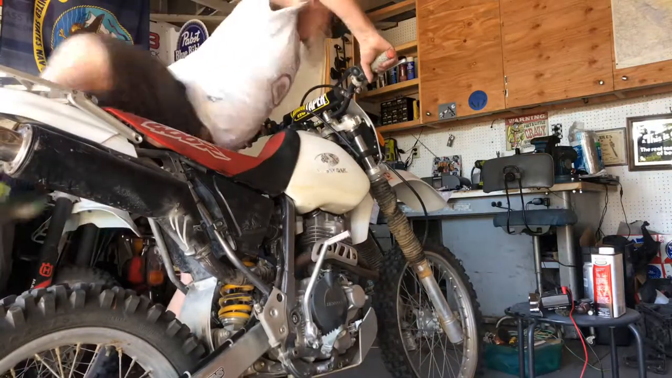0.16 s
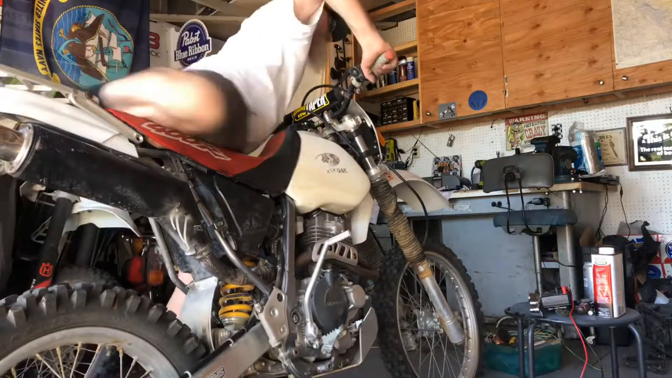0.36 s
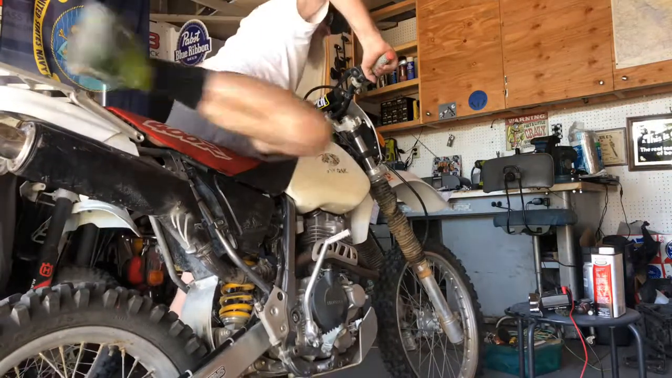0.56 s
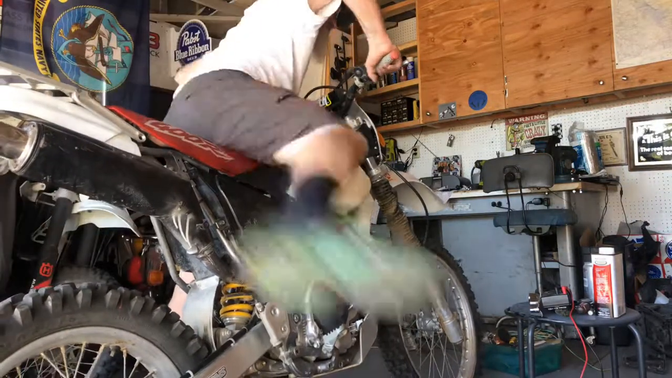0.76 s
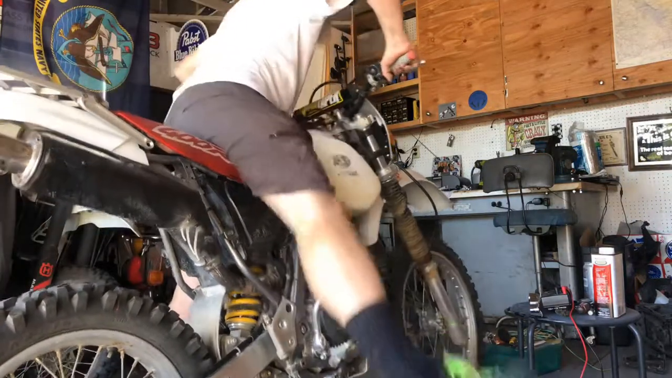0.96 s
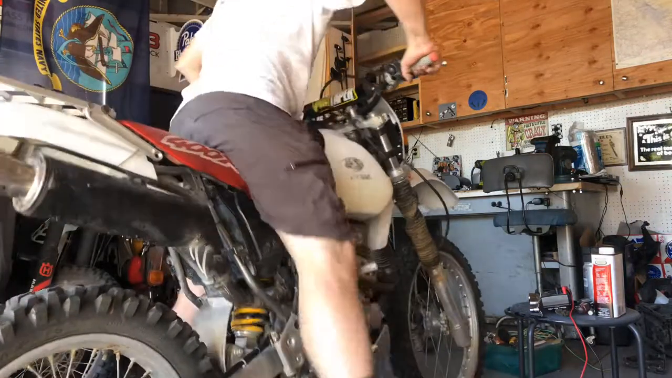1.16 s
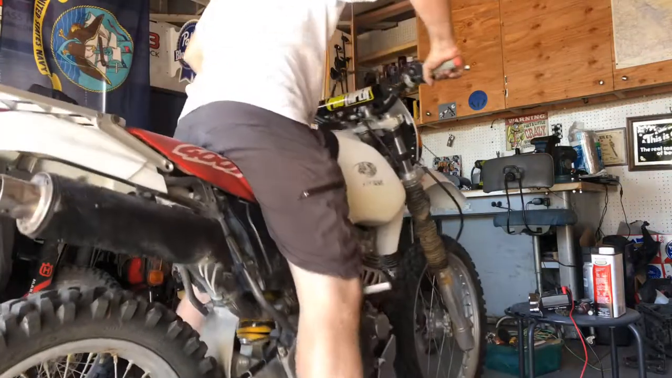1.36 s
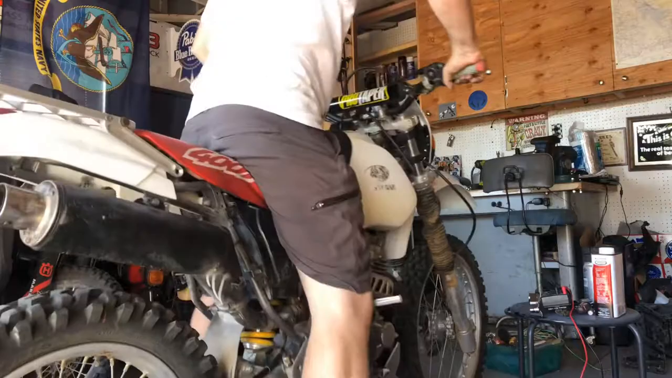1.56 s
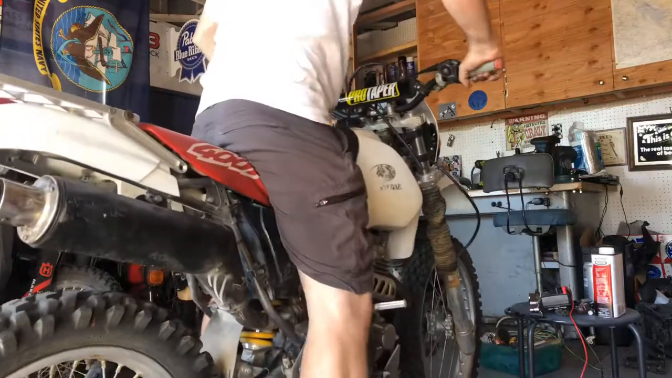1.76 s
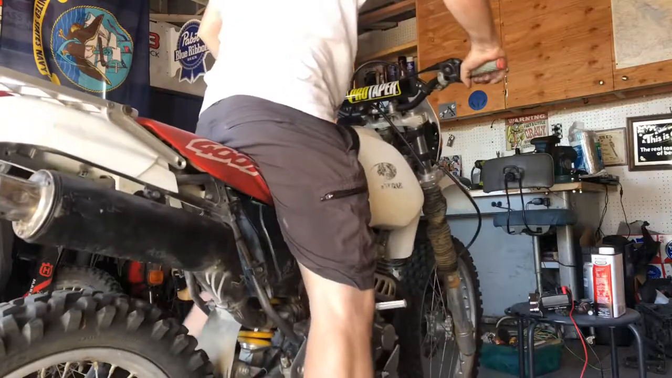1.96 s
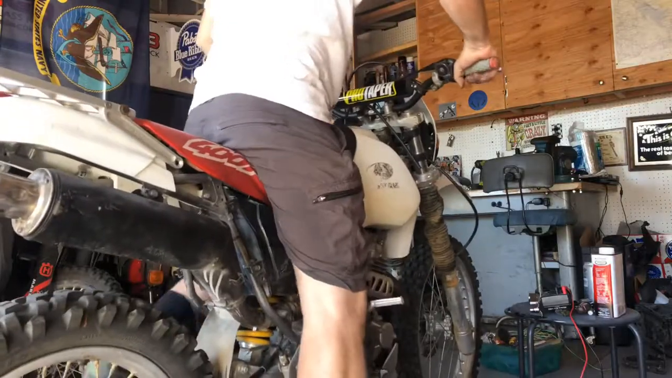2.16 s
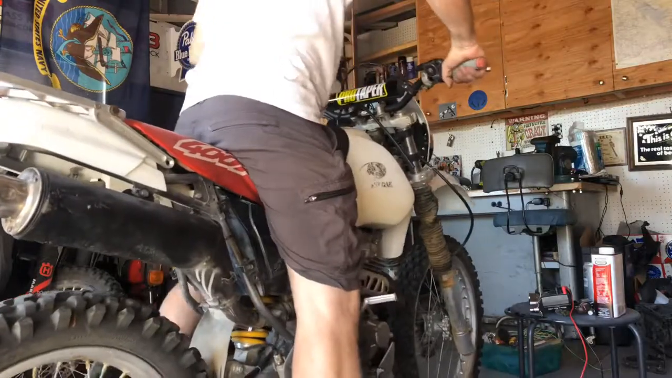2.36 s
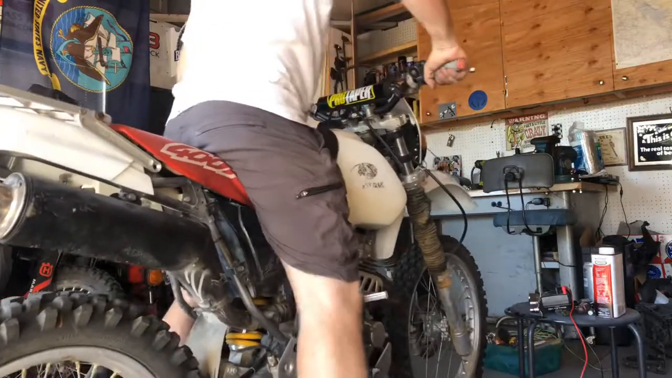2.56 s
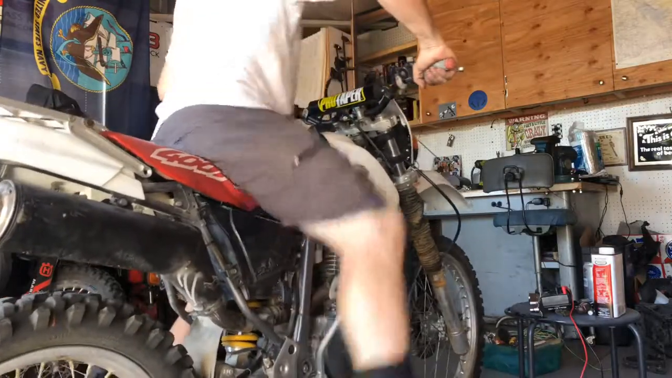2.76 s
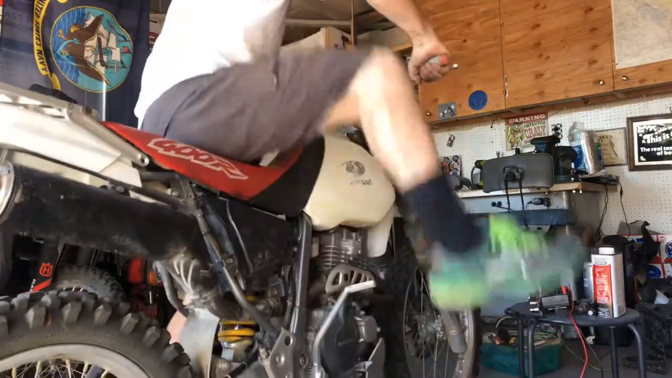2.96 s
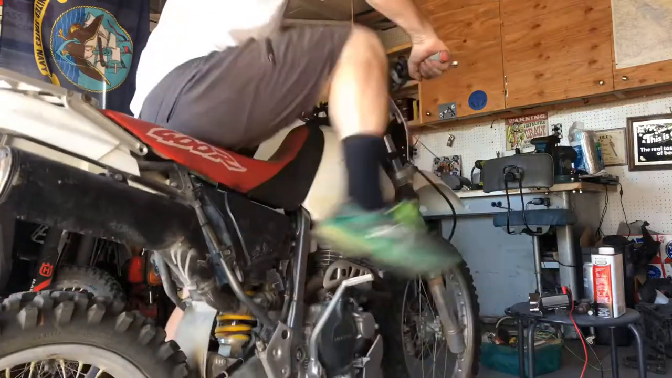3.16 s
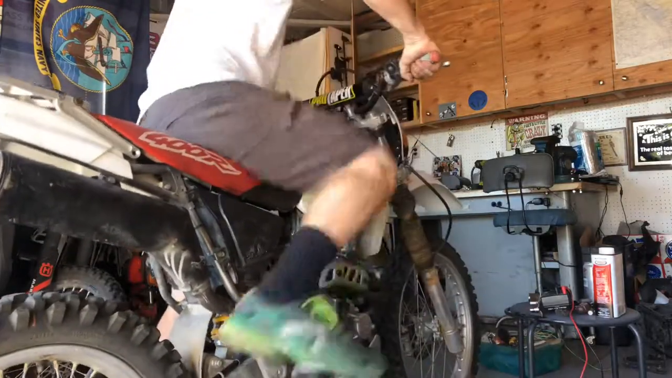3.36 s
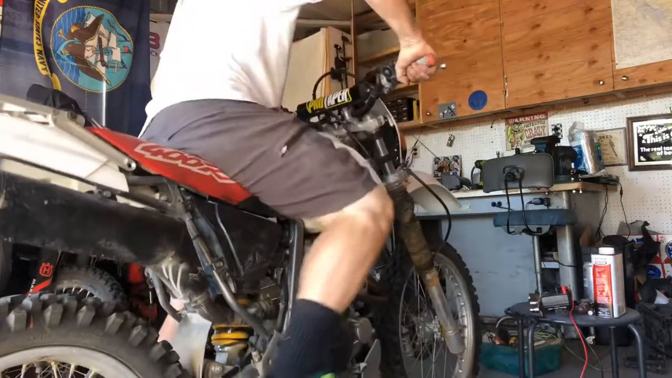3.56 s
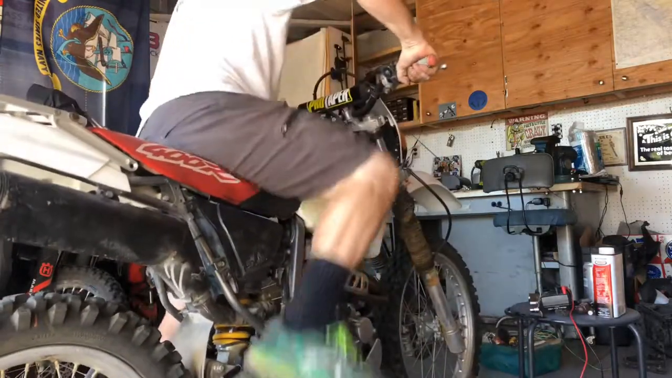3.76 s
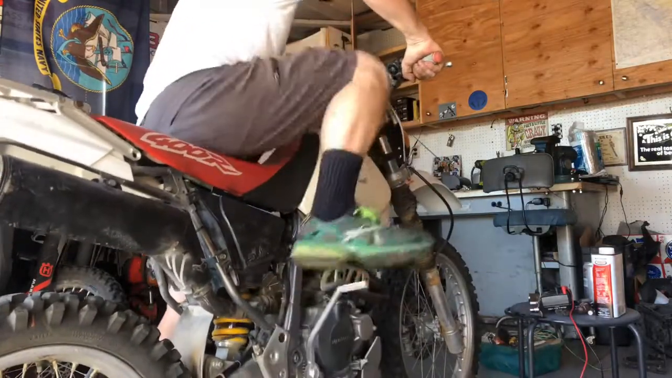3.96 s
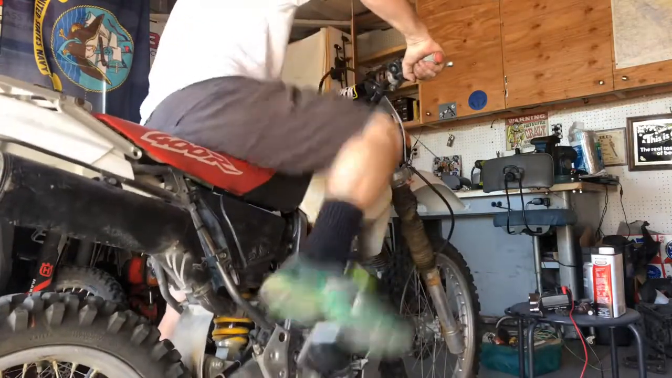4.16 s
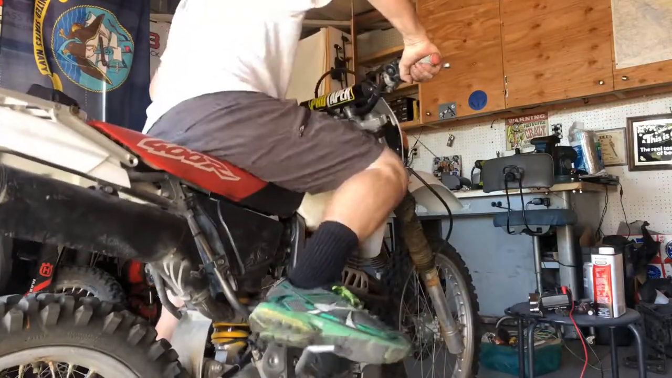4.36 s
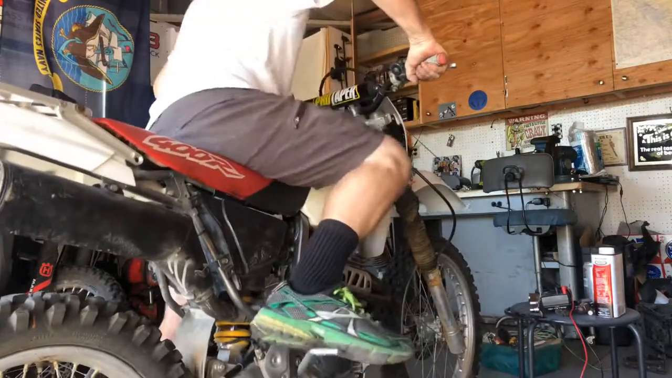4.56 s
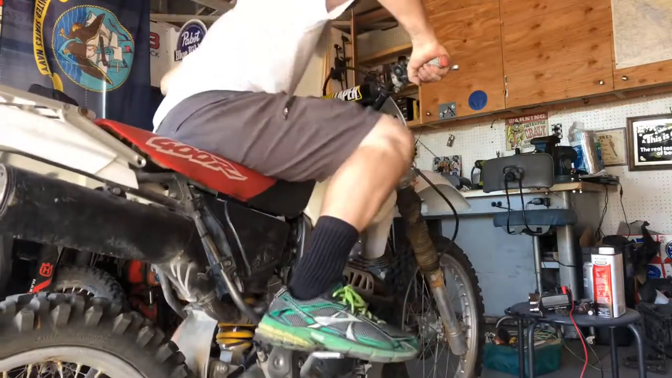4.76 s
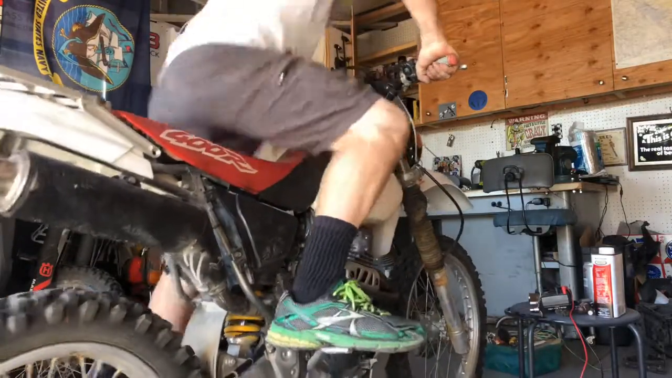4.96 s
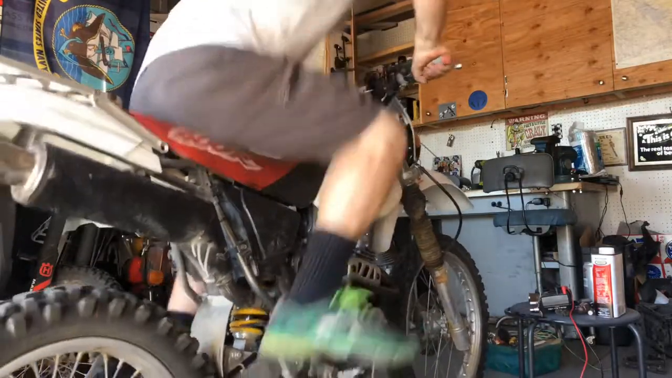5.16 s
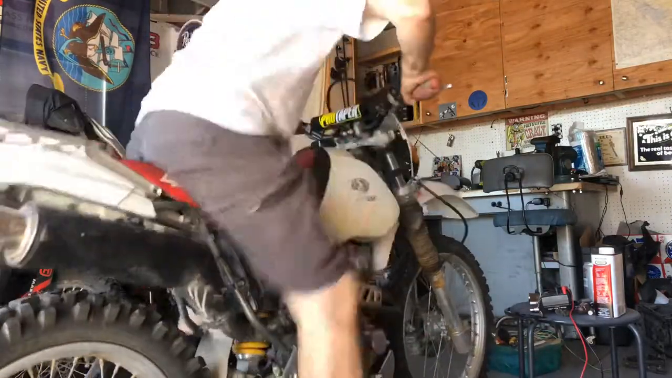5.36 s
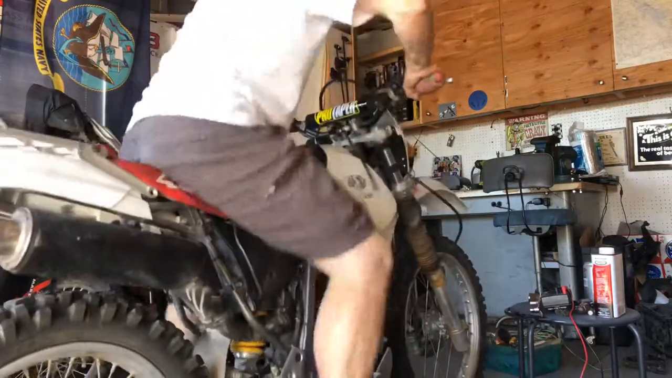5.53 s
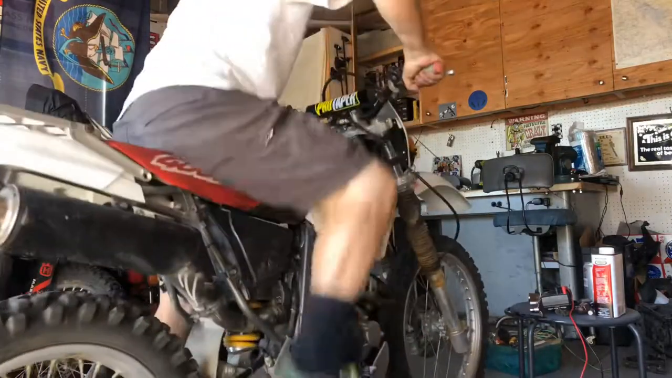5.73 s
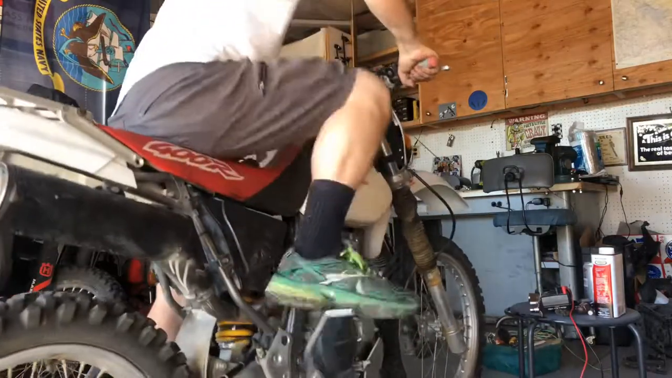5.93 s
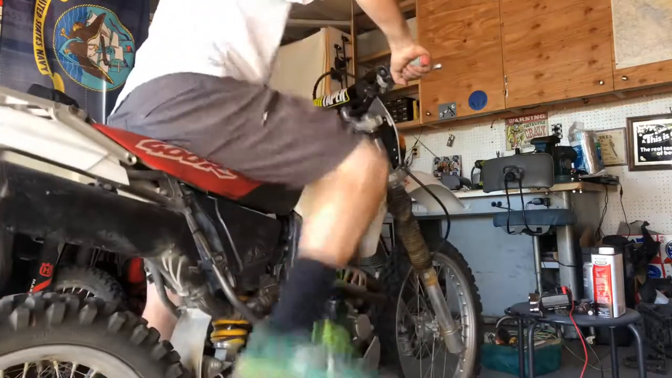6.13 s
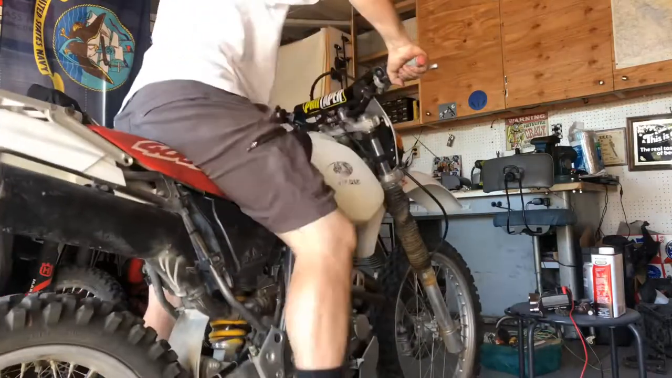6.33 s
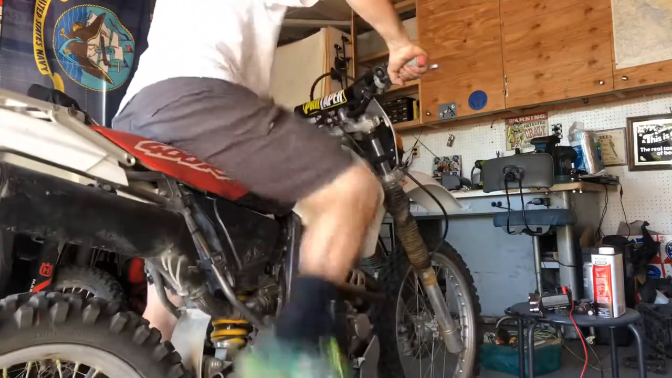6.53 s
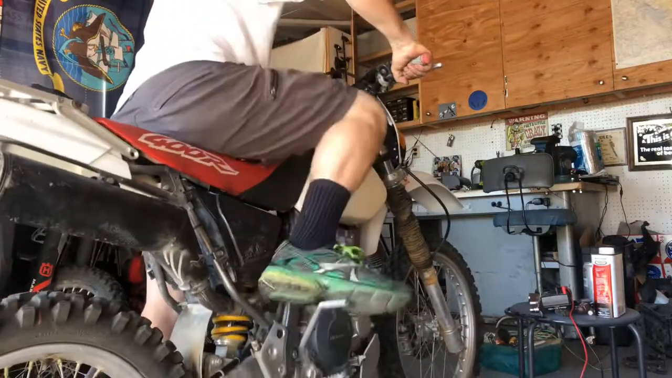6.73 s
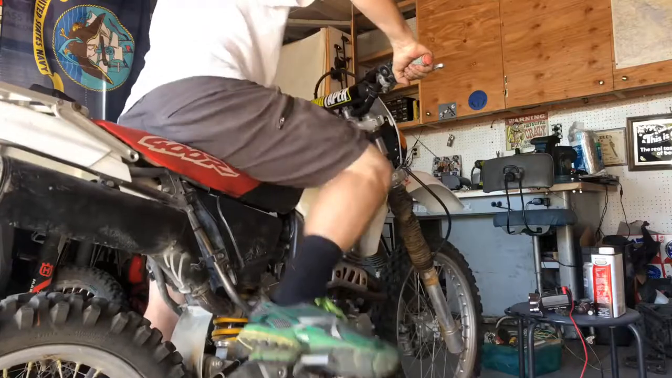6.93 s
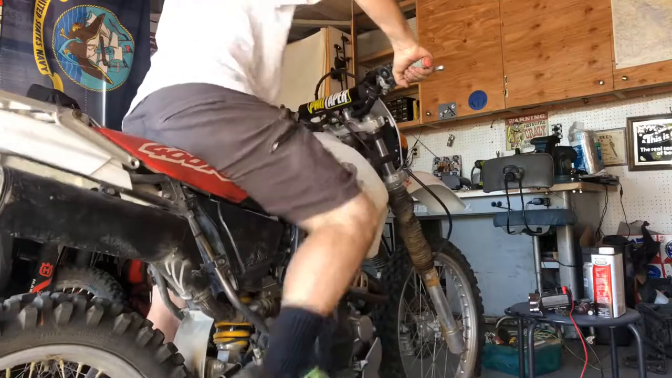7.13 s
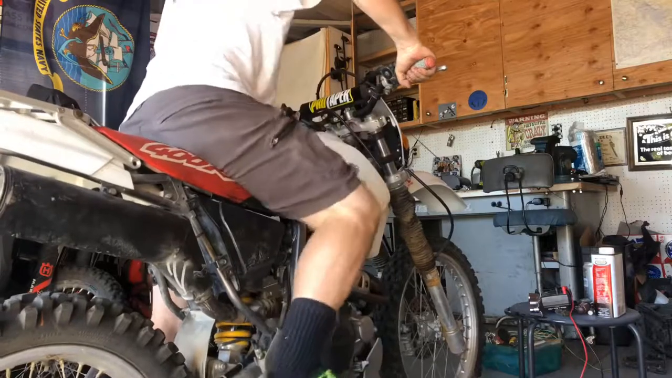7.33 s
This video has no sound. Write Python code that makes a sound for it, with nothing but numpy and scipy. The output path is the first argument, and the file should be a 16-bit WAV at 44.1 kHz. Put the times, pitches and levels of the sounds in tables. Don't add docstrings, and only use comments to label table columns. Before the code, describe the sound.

Quiet hiss and sparse steel ticks lead to a loud stand clang with a short metallic ring. The kick lever raps and clatters, air puffing weakly in the exhaust. A heavy kick later brings a sharp crack and booming low double thump, followed by rapid bright ratchet clicking, cloth scuffs and lighter clunks. Close phone pickup in a small garage with a short reverberant tail, distant traffic underneath, gain dipping after blows.

```python
import sys
import numpy as np
from scipy import signal
from scipy.fft import rfft, irfft, next_fast_len
from scipy.io import wavfile
from scipy.ndimage import map_coordinates

SR = 44100
rng = np.random.default_rng(int(sys.argv[2]) if len(sys.argv) > 2 else 0)


def master_out(mix):
    frames = np.transpose(np.atleast_2d(mix))
    ceiling = np.clip(frames, -1, 1)
    pcm = np.round(ceiling * 32767).astype(np.int16)
    wavfile.write(sys.argv[1], SR, pcm)


def gain_from_db(level_db):
    decades = np.asarray(level_db, float) / 20
    return 10 ** decades


N = 330309

# frequency in Hz, level in dB per Hz.
HISS_COLOUR = [(590, -23), (1000, -9.5), (1350, -7), (1710, -8), (2440, -13), (3080, -9.5), (6550, -15),
               (16000, -26.5)]
# time in seconds, level in dB.
TRAFFIC_LEVEL = [(0.0, -64.5), (1.92, -59), (2.3, -51.5), (3.23, -54.5), (3.5, -55.5), (3.8, -54.5),
                 (5.28, -55), (5.5, -51.5), (6.24, -52), (7.49, -56)]
# frequency in Hz, level in dB per Hz.
MURMUR_COLOUR = [(88, -47), (150, 2), (398, 3.5), (780, -0.5), (837, -7), (919, -1), (1310, -21.5),
                 (2500, -18.5), (3250, -71), (5500, -120)]
# frequency in Hz, level in dB per Hz.
RUMBLE_COLOUR = [(15, -50), (25, -15), (75, -2.5), (102, -4.5), (128, 1.5), (200, -37), (260, -19),
                 (440, -120)]
# full at in seconds, level in dB, held in seconds.
SHUDDERS = [
    (5.53, -26, .01),
    (6.0, -58, .4),
]
# frequency in Hz, 60 dB decay in seconds.
GARAGE_DECAY = [(150, 0.52), (1000, 0.39), (4000, 0.32), (8000, 0.26), (15000, 0.15)]

# full at in seconds, level in dB, held in seconds.
SCUFFS = [(0.46, -62.5, 0.17), (2.5, -61.5, 0.47), (3.45, -61, 0.023), (3.76, -49.5, 0.075),
          (4.3, -61.5, .65), (6.32, -54, 0.18), (6.86, -52, 0.09), (7.12, -48.5, 0.13)]
# frequency in Hz, level in dB per Hz.
SCUFF_COLOUR = [(530, -35.5), (900, 6.5), (1860, -6.5), (2080, -25), (2330, -1.5), (3910, -7), (4870, -9),
                (6050, -11.5), (14000, -33)]

# frequency in Hz, level in dB, 60 dB decay in seconds.
SPRING_MODES = [(658, 0, 8), (1083, -1, 1.1), (1330, -11, .8), (1500, -10.5, .5)]
# frequency in Hz, level in dB, 60 dB decay in seconds.
STAND_MODES = [(378, 1, 1.24), (987, 10, 0.49), (1500, -4, .19), (1670, -7.5, 1), (2160, -26, .6),
               (3240, -25, 2.5), (3340, -28, 2.3)]
# frequency in Hz, level in dB, 60 dB decay in seconds.
TUBE_MODES = [(916, 1.5, 0.37), (1093, -4.5, 0.3)]
# frequency in Hz, level in dB, 60 dB decay in seconds.
PEG_MODES = [(630, -5.5, 0.26), (699, -3.5, 0.47)]
# frequency in Hz, level in dB, 60 dB decay in seconds.
LEVER_MODES = [(684, -5, 0.55), (1440, 2.5, 0.41), (4800, -13, .3)]
# frequency in Hz, level in dB, 60 dB decay in seconds.
CLIP_MODES = [(4040, 0, 1.06)]
# start in seconds, level in dB, rings until damped in seconds.
SPRING_STRIKES = [(1.998, -46, 0.85)]
STAND_STRIKES = [(2.142, -39.5, 0.93)]
TUBE_STRIKES = [(1.835, -49.5, .6), (1.997, -44.5, .6), (2.144, -19, 0.21), (3.502, -46, .6),
                (3.725, -39, 0.14), (4.265, -39, .6), (6.084, -42, 1)]
PEG_STRIKES = [(6.905, -34, 0.22)]
LEVER_STRIKES = [(1.329, -50, .6)]
CLIP_STRIKES = [(1.012, -61, 0.37)]

# frequency in Hz, width in Hz, level in dB.
CASE_MODES = [(2860, 570, -12), (3610, 71, -4), (4110, 77, -2.5), (4280, 100, -8), (5920, 370, -7.5),
              (8040, 33, -6.5), (8790, 50, -12)]
# start in seconds, peak in dB, weight behind it in dB, ringing part in Hz.
CLICKS = [(0.4704, -60, -17, 2560), (1.0115, -33.5, -21, 4660), (1.0554, -31, -21, 5000),
          (1.668, -50, -11.5, 1380), (1.914, -44, -26, 4250), (1.9949, -37, -17, 2320),
          (2.0968, -29.5, -21, 6940), (3.2781, -30.5, -5, 1790), (3.4202, -27, -20, 5960),
          (3.474, -37, -14, 4140), (3.5183, -40.5, -25, 1970), (3.6194, -45.5, -16, 6240),
          (3.7264, -36, -29, 1100), (4.9476, -37.5, -14, 6450), (5.1592, -45.5, -6.5, 4340),
          (5.215, -34, -7.5, 4230), (5.4006, -23, -4, 3280), (5.456, -10, -51, 6040),
          (6.2771, -36, -8, 2010), (6.347, -29, -38, 4100), (7.038, -48, -13, 2040),
          (7.2044, -42, -5.5, 5660), (7.2825, -38.5, -9, 2500), (7.3794, -50.5, -7, 4180),
          (7.4437, -34, -22, 4500)]
# start in seconds, peak in dB, weight behind it in dB, ringing part in Hz.
RAPS = [(0.657, -52.5, -12, 1440), (1.8351, -41, -1, 900), (3.305, -25.5, -13, 1740),
        (3.33, -36.5, -1, 1730), (3.3498, -33.5, -10, 2030), (3.5588, -45.5, -7, 2880),
        (3.9809, -33, -5, 670), (4.1716, -43.5, 3, 1930), (4.1947, -35.5, -14, 1900),
        (4.2649, -32, -13, 2670), (4.2896, -39.5, 0, 2700), (4.9114, -58, 2, 1710),
        (5.2476, -34.5, -1, 1110), (6.1194, -50, 12, 3780), (6.2078, -44.5, 3, 2140),
        (6.3794, -35, -24, 2710), (6.4775, -42, -15, 1720), (7.101, -43, -1, 700)]
# start in seconds, peak in dB, weight behind it in dB, ringing part in Hz.
CLUNKS = [(0.5677, -53, -15, 3150), (1.3288, -36.5, -41, 4800), (3.3747, -38.5, -3, 2280),
          (5.2926, -19.5, -22, 4070), (6.0817, -30.5, -10.5, 2900), (6.8712, -33.5, -32, 1730),
          (6.9047, -31.5, -6, 1800)]
# start in seconds, peak in dB, weight behind it in dB, ringing part in Hz.
REBOUNDS = [(4.2246, -33, -11, 3800), (5.0174, -56, 7.5, 4000), (5.2234, -32, 5, 706),
            (5.4883, -22.5, -10, 1570)]
# start in seconds, peak in dB, weight behind it in dB, ringing part in Hz.
STAND_SLAM = [
    (2.1435, -19, -2.5, 1500),
    (2.1646, -25, -2, 740),
]
# start in seconds, peak in dB, ringing part in Hz.
RATCHET_TEETH = [(3.8731, -20, 5900), (3.9237, -17, 4860), (5.691, -22.5, 4150), (5.7432, -18.5, 7400),
                 (5.796, -20.5, 2930), (5.8469, -21.5, 3000), (5.8948, -21, 3030), (5.9469, -15.5, 3080),
                 (6.5451, -21, 4280), (6.5832, -20.5, 5920), (6.62, -19, 2430), (6.6636, -20, 6300),
                 (6.717, -19.5, 4850)]

# start
# in seconds, level in dB, push +1 or suck -1, overtones in dB.
LOW_THUMPS = [(2.151, -39.5, 1, 16.5), (3.3, -55, 1, 12), (3.411, -49.5, 1, 15), (3.554, -41.5, 1, -11),
              (3.65, -45.5, 1, -14), (3.98, -55.5, 1, 13), (4.19, -47, 1, 7), (4.267, -55, 1, 19.5),
              (5.381, -11.5, 1, 5), (5.402, -20, -1, -11), (5.488, -27, -1, -1), (5.535, -13.5, -1, 1),
              (5.59, -32, -1, 4), (6.1, -64, 1, 17), (6.287, -40.5, 1, 4), (6.409, -34, 1, 0.5),
              (6.908, -48, 1, 7.5), (7.145, -42.5, -1, 6.5), (7.189, -42, -1, -15), (7.233, -40, -1, 1.5)]
# frequency in Hz, level in dB, 60 dB decay in seconds.
PIPE_MODES = [(61.6, 1.5, 0.48), (69.8, -0.5, 0.39), (104.5, 1.5, 0.13), (122.4, -1.5, 0.263),
              (260.6, -18, 0.37)]
# full at in seconds, level in dB, held in seconds.
BREATHS = [(3.34, -37.5, 0.038), (3.528, -41.5, .01), (5.25, -35.5, .19), (5.478, -21.5, .01),
           (6.12, -45, 0.25), (6.316, -44.5, 0.11), (6.928, -40, 0.0079), (7.112, -44, 0.11),
           (7.47, -60, .05)]
# frequency in Hz, width in Hz, level in dB.
MUFFLER_CHAMBERS = [(70.4, 26, 2.5), (275.4, 9.9, 6), (363, 27, -26), (639.4, 45, 6.5), (933, 84, -2)]


def unit(x):
    return x / np.sqrt(np.mean(x ** 2) + 1e-20)


def along(points, hz):
    f, v = np.transpose(points)
    return np.interp(np.log(hz + 1), np.log(f + 1), v)


def curve(rows):
    return np.interp(np.arange(N) / SR, *np.transpose(rows))


def noise(gain):
    m = next_fast_len(N)
    spectrum = rfft(rng.standard_normal(m)) * gain(np.fft.rfftfreq(m, 1 / SR))
    return unit(irfft(spectrum, m)[:N])


def coloured(points):
    return noise(lambda f: gain_from_db(along(points, f)))


def wobble(rate):
    knots = rng.standard_normal(int(N * rate / SR) + 4)
    return map_coordinates(knots, [np.arange(N) * rate / SR])


def strokes(rows, rise_db_s, fall_db_s):
    t = np.arange(N) / SR
    total = np.zeros(N)
    for s, db, held in rows:
        before, after = np.maximum(s - t, 0), np.maximum(t - s - held, 0)
        total += gain_from_db(db - rise_db_s * before - fall_db_s * after)
    return total


def ring(modes, t, scatter_db):
    total = np.zeros(len(t))
    for hz, db, t60 in modes:
        total += gain_from_db(db + scatter_db * rng.normal() - 60 * t / t60) * np.sin(2 * np.pi * hz * t)
    return total


def garage(count):
    hz, t, z = signal.stft(rng.standard_normal(count), SR, nperseg=256)
    build = 1 - np.exp(-(np.maximum(t - 0.003, 0) / 0.0023) ** 2)
    decay = gain_from_db(-60 * t / along(GARAGE_DECAY, hz)[:, None])
    tail = signal.istft(z * decay * build, SR, nperseg=256)[1][:count]
    return tail / np.linalg.norm(tail)


def microphone_hiss():
    return gain_from_db(-68.5) * coloured(HISS_COLOUR)


def traffic_murmur():
    return gain_from_db(curve(TRAFFIC_LEVEL)) * gain_from_db(0.3 * wobble(5.4)) * coloured(MURMUR_COLOUR)


def low_rumble():
    street = gain_from_db(-4) * gain_from_db(curve(TRAFFIC_LEVEL))
    shudder = strokes(SHUDDERS, rise_db_s=165, fall_db_s=142)
    return (street + shudder) * gain_from_db(1.1 * wobble(6.1)) * coloured(RUMBLE_COLOUR)


def scuffing():
    level = gain_from_db(-3.5) * strokes(SCUFFS, rise_db_s=126, fall_db_s=126)
    clumps = gain_from_db(1.7 * wobble(60) + 2.8 * wobble(14))
    return level * unit(clumps * coloured(SCUFF_COLOUR))


def steel(modes, strikes):
    out, t = np.zeros(N + SR), np.arange(SR) / SR
    waver = gain_from_db(1.4 * wobble(20))
    for s, db, until_s in strikes:
        swell = 1 - np.exp(-t / 0.001)
        damped = np.maximum(1 - (t / until_s) ** 4, 0)
        out[round(s * SR):][:SR] += gain_from_db(db) * ring(modes, t, 1.75) * swell * damped
    return waver * out[:N]


def frame():
    parts = [(SPRING_MODES, SPRING_STRIKES), (STAND_MODES, STAND_STRIKES), (TUBE_MODES, TUBE_STRIKES),
             (PEG_MODES, PEG_STRIKES), (LEVER_MODES, LEVER_STRIKES), (CLIP_MODES, CLIP_STRIKES)]
    return sum(steel(modes, strikes) for modes, strikes in parts)


def engine_case(shock):
    total = np.zeros(len(shock))
    for hz, width, db in CASE_MODES:
        resonance = signal.lfilter(*signal.iirpeak(hz, max(hz / width, 12), SR), shock)
        total += gain_from_db(db + 5 + 2.4 * rng.normal()) * resonance
    return total


def band(x, order, low_hz, high_hz):
    return signal.sosfilt(signal.butter(order, (low_hz, high_hz), "bandpass", fs=SR, output="sos"), x)


def contacts(events, knock_db, bright_db, blow_s=0.03, wet_db=3.0, part_db=6, graze_s=0.0023):
    out = np.zeros(N + SR)
    t = np.arange(SR // 2) / SR - 0.016
    after = np.maximum(t - 0.002, 0)
    graze = np.exp((t - 0.002 - after) / graze_s)
    lasting_s = np.array([[0.06], [0.04], [blow_s], [blow_s], [blow_s * 1.23]])
    for s, db, thud_db, part_hz in events:
        shock = rng.standard_normal((5, len(t))) * graze * gain_from_db(-60 * after / lasting_s)
        thud = gain_from_db(thud_db + 18.5) * band(shock[0], 2, 200, 560)
        knock = gain_from_db(knock_db + 12.5) * band(shock[1], 2, 620, 1900)
        crack = gain_from_db(1.0) * band(shock[2], 3, 1500, 6500)
        snap = gain_from_db(bright_db - 1.5) * band(shock[3], 2, 6500, 13200)
        part = gain_from_db(part_db) * signal.lfilter(*signal.iirpeak(part_hz, 18, SR), shock[4])
        blow = thud + knock + crack + snap + part + engine_case(shock[4])
        tail = signal.fftconvolve(blow, garage(len(t)))[:len(t)]
        out[round((s + t[0]) * SR):][:len(t)] += gain_from_db(db - 2.5) * (blow + gain_from_db(wet_db) * tail)
    return out[:N]


def clatter():
    clicks = contacts(CLICKS, knock_db=-11.5, bright_db=-6.5)
    raps = contacts(RAPS, knock_db=-2.5, bright_db=-28, graze_s=0.004)
    clunks = contacts(CLUNKS, knock_db=-8.0, bright_db=-40)
    rebounds = contacts(REBOUNDS, knock_db=-10, bright_db=-14)
    slam = contacts(STAND_SLAM, knock_db=5, bright_db=-8.5, blow_s=0.057, wet_db=2.0, part_db=8)
    return clicks + raps + clunks + rebounds + slam


def ratchet():
    weight_db = -24
    teeth = [(s, db, weight_db, hz) for s, db, hz in RATCHET_TEETH]
    return contacts(teeth, knock_db=-13.5, bright_db=-5.0, blow_s=0.024, wet_db=0.5, part_db=2.5)


def exhaust_thumps():
    out, t = np.zeros(N + SR), np.arange(SR // 2) / SR
    carry_over = 0.61
    for s, db, sign, overtone_db in LOW_THUMPS:
        thump = ring(PIPE_MODES[:2], t, 0) + gain_from_db(overtone_db) * ring(PIPE_MODES[2:], t, 0)
        onset = 1 - np.exp(-t / 0.0076)
        here = out[round(s * SR):][:len(t)]
        here *= carry_over + (1 - carry_over) * np.exp(-t / 0.004)
        here += gain_from_db(db + 1.0) * np.sign(sign) * thump * onset
    return out[:N]


def muffler_gain(f):
    return sum(gain_from_db(db) * w * f / np.abs(c * c - f * f + 1j * f * w) for c, w, db in MUFFLER_CHAMBERS)


def exhaust_breath():
    flow = gain_from_db(-1.0) * strokes(BREATHS, rise_db_s=452, fall_db_s=143)
    return flow * gain_from_db(0.83 * wobble(23)) * noise(muffler_gain)


def scene():
    background = microphone_hiss() + traffic_murmur() + low_rumble()
    rider = scuffing()
    metal = frame() + clatter() + ratchet()
    exhaust = exhaust_thumps() + exhaust_breath()
    return (background + rider + metal + exhaust)[None]


def band_limit(x):
    return signal.sosfilt(signal.butter(12, 16500, fs=SR, output="sos"), x)


def record(dry):
    x = signal.sosfiltfilt(signal.butter(3, 44, "highpass", fs=SR, output="sos"), dry)
    x = signal.sosfilt(signal.butter(12, 15700, fs=SR, output="sos"), x)
    keep = np.exp(-1 / (0.15 * SR))
    loudness = np.sqrt(signal.lfilter([1 - keep], [1, -keep], x ** 2))
    gain = (1 + loudness / gain_from_db(-72)) ** -0.15
    return band_limit(x * gain)


dry = scene()
out = record(dry)
master_out(out)
```